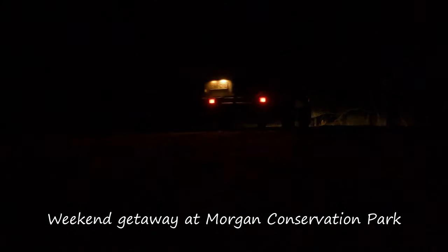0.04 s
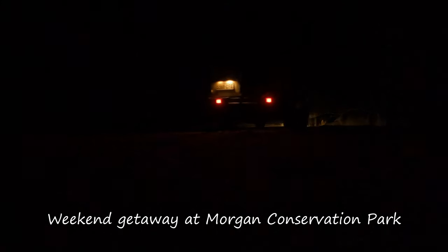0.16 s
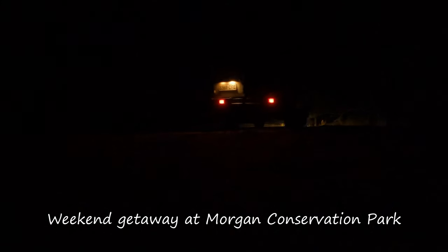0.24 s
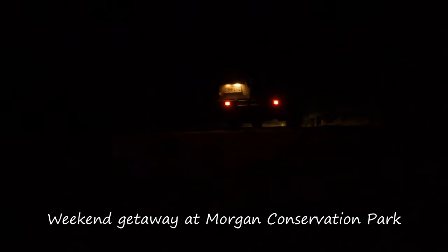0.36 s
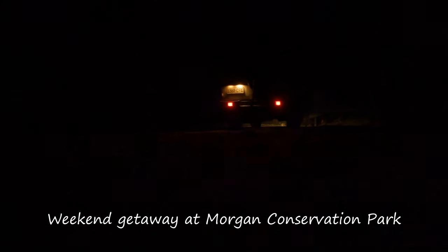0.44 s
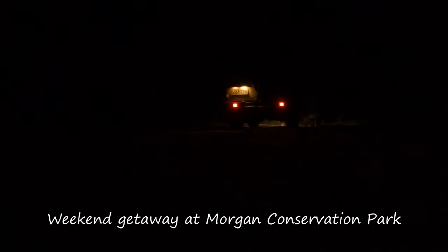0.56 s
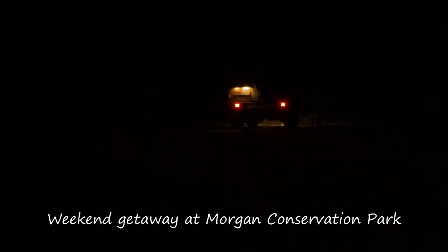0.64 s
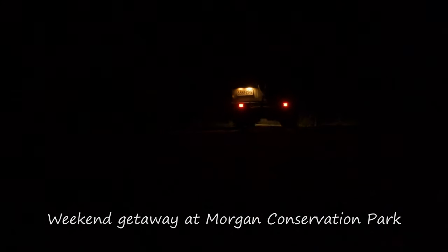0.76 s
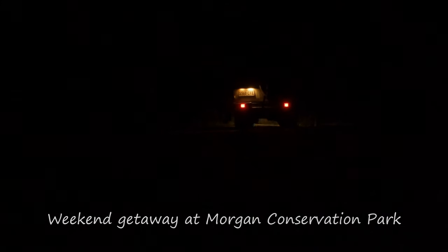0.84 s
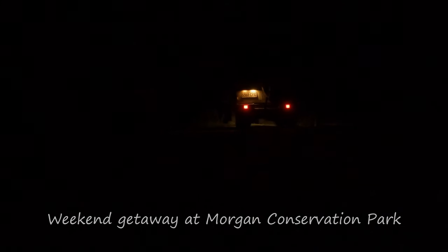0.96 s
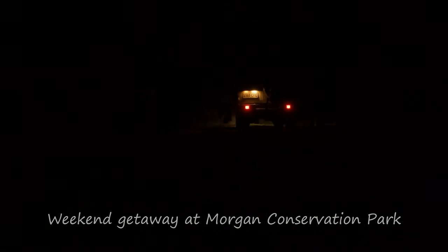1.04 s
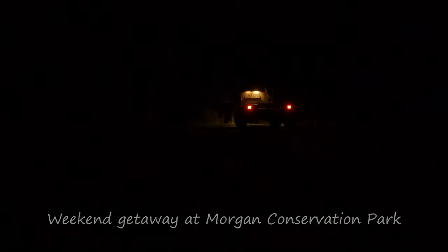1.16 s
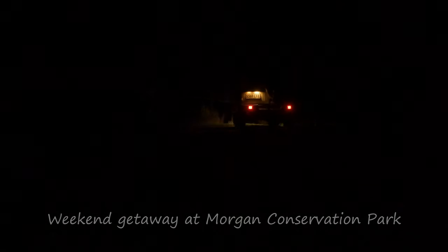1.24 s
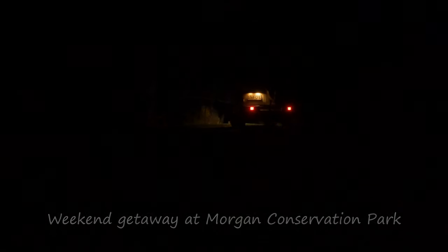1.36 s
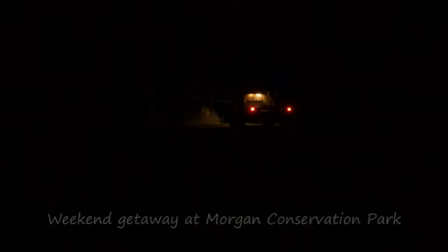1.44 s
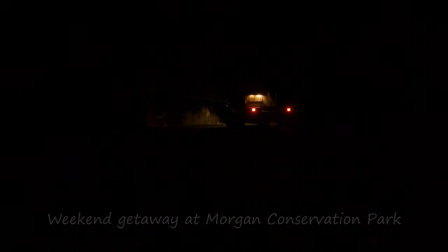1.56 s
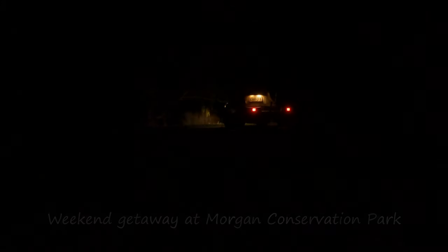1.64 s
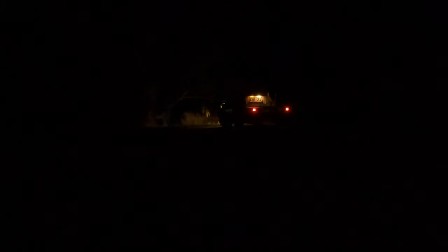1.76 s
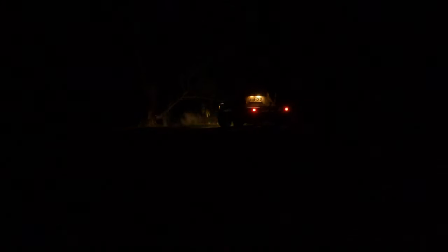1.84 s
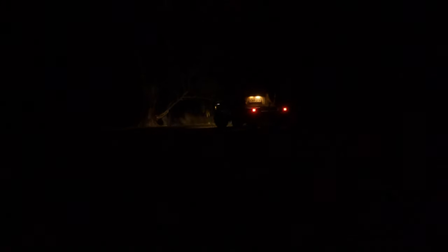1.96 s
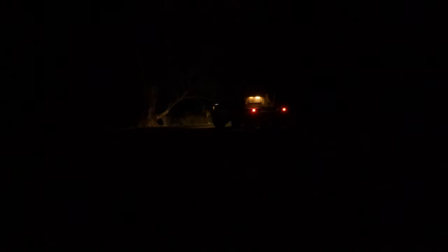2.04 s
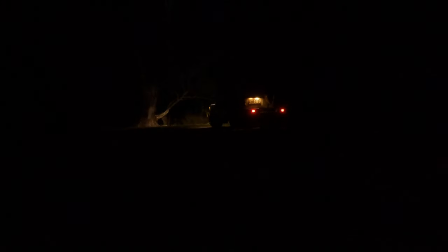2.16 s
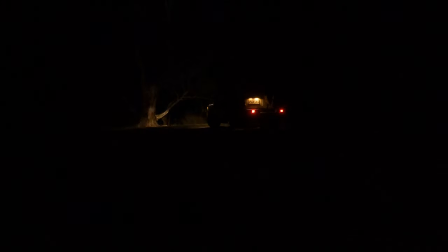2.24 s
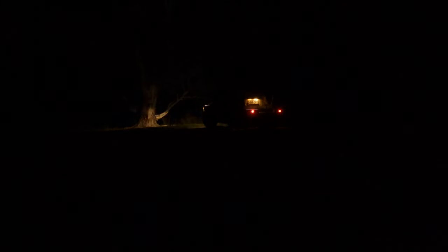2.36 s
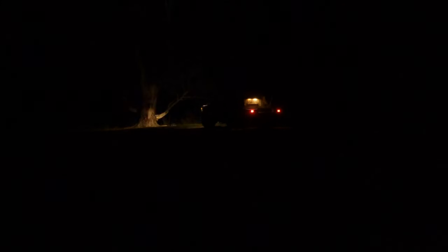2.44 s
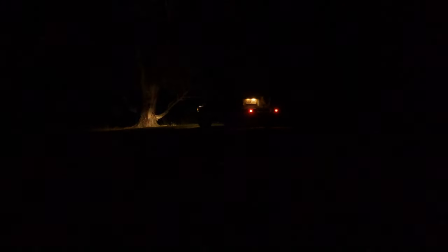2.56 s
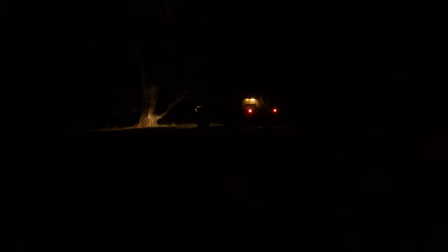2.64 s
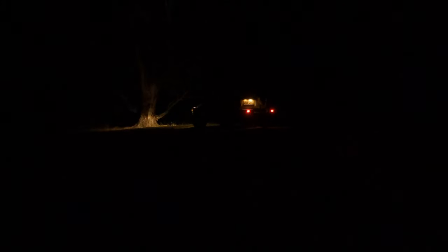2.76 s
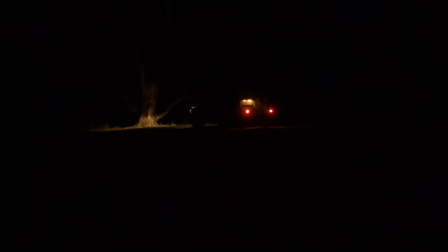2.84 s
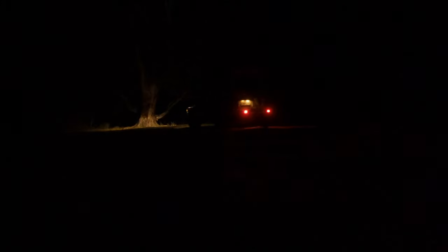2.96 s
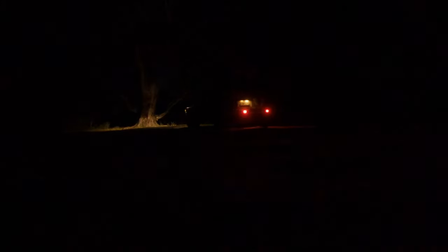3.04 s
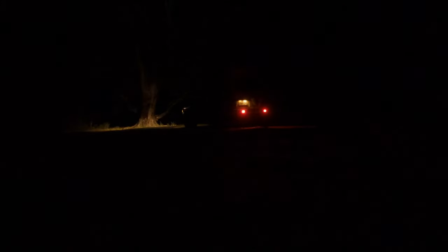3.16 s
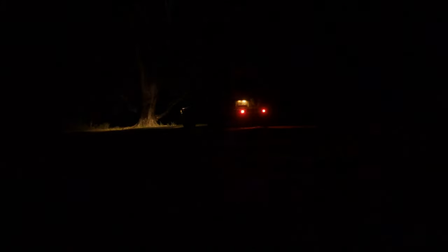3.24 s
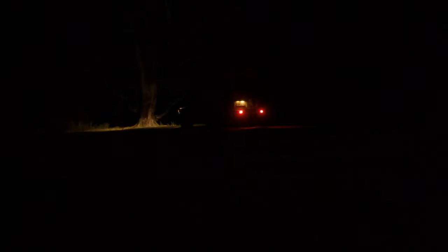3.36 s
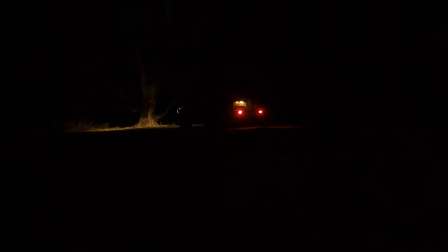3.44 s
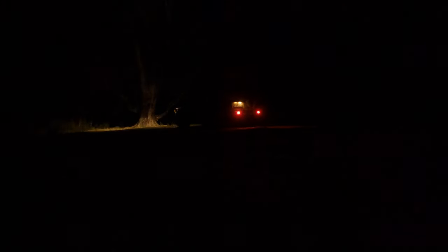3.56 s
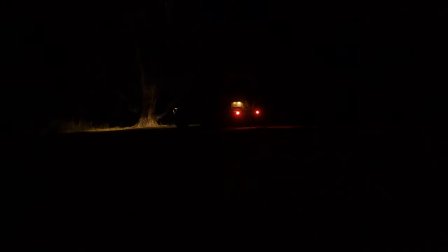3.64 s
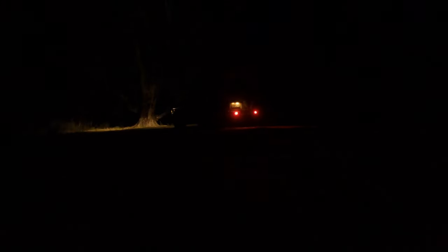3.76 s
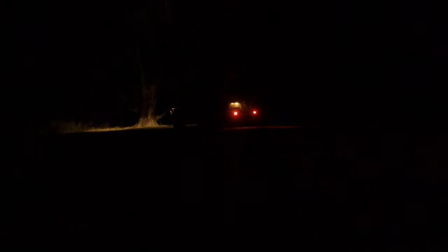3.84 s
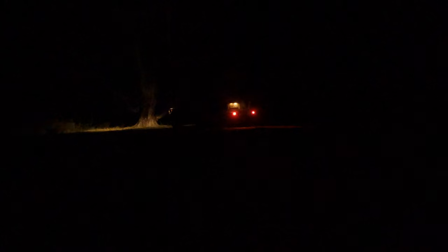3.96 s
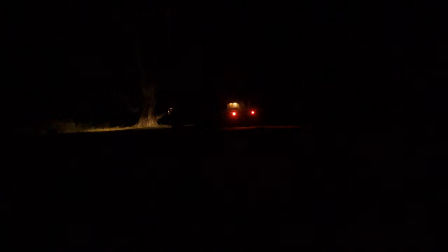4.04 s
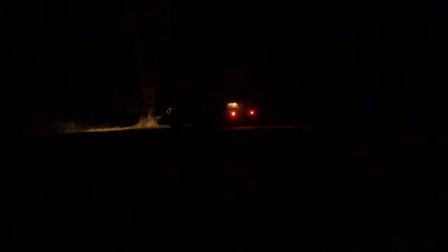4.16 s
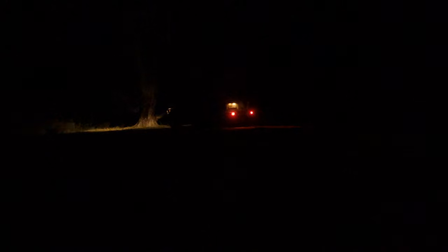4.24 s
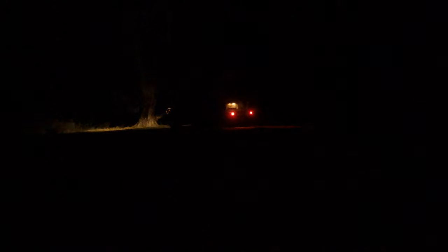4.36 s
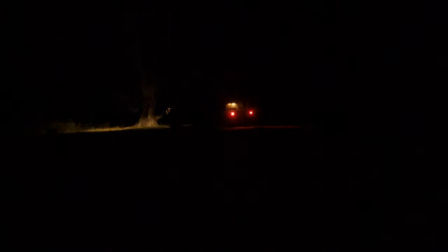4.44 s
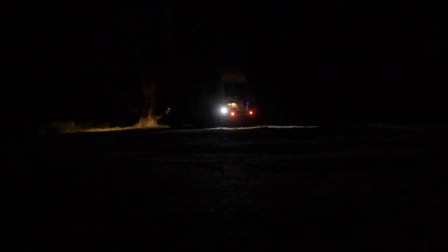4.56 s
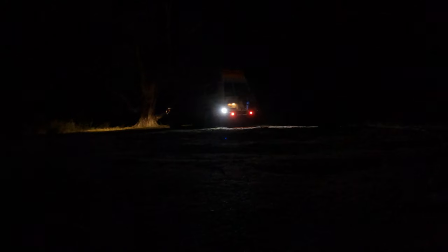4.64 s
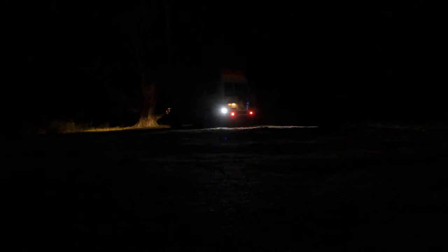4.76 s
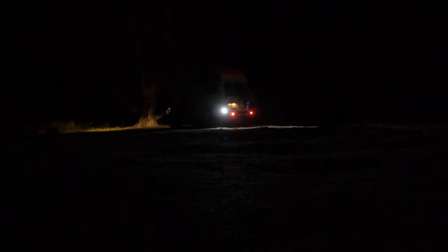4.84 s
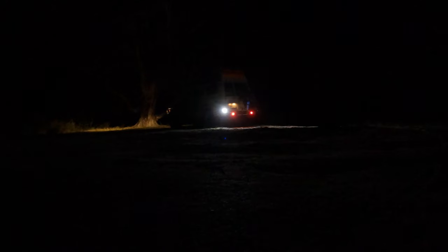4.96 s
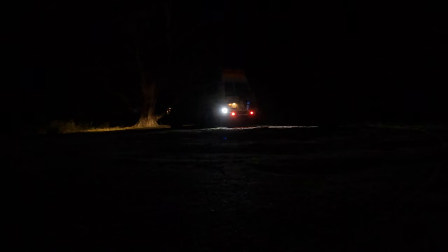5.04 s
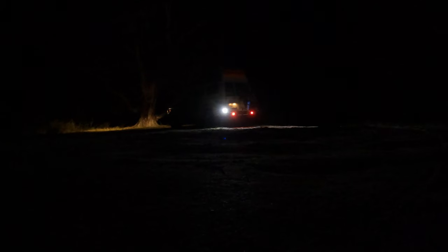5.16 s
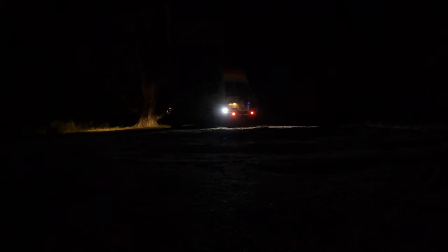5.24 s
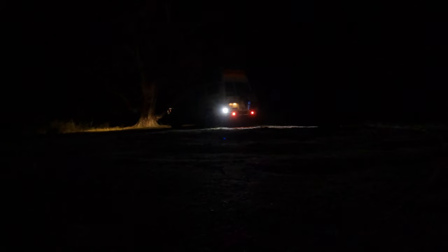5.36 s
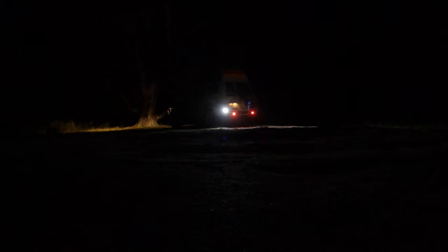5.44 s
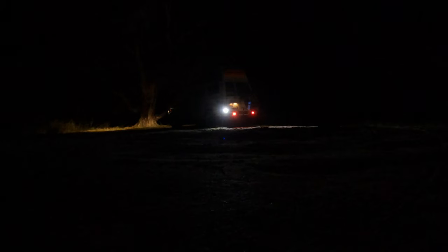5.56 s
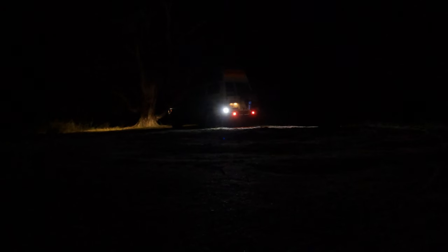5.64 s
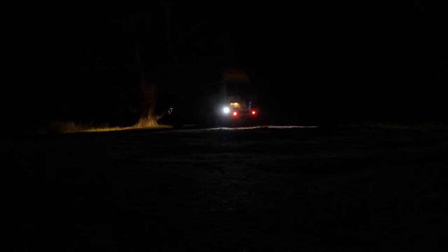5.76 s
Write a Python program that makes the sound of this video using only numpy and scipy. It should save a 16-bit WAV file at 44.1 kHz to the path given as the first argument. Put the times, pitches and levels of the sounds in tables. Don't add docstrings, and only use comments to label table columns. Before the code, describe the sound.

Low droning van engine recedes, drops to idle, grates and knocks into gear, and gently revs up, with small ticks and soft wind bumps.

```python
import sys
import numpy as np
from scipy import signal
from scipy.fft import rfft, irfft, next_fast_len
from scipy.io import wavfile
from scipy.ndimage import uniform_filter1d, map_coordinates

SR = 44100
rng = np.random.default_rng(int(sys.argv[2]) if len(sys.argv) > 2 else 0)


def boost(x):
    u = np.asarray(x, float) / 20
    return 10 ** u


def master(y):
    cut = np.clip(np.atleast_2d(y).T, -1, 1)
    pcm = np.round(cut * 32767)
    wavfile.write(sys.argv[1], SR, pcm.astype(np.int16))


N = 255339


def unit(x):
    return x / np.sqrt(np.mean(x ** 2) + 1e-20)


def curves(rows):
    s, *cols = np.transpose(rows)
    return [np.interp(np.arange(N) / SR, s, c) for c in cols]


def along(points, hz):
    f, v = np.transpose(points)
    return np.interp(np.log(hz + 1), np.log(f + 1), v)


def wobble(rate_hz, step=1):
    knots = rng.standard_normal(int(N * rate_hz / SR) + 4)
    return map_coordinates(knots, [np.arange(0, N, step) * rate_hz / SR])


def noise(spectrum, gate):
    # f/Hz, correlation/1
    likeness = [(60, .985), (250, .98), (500, .97), (1000, .94), (2000, .82), (4000, .62), (10000, .66)]
    # f/Hz, left minus right/dB
    lean_db = [(125, .3), (250, -.7), (500, -1.5), (1000, -1.4), (2000, -.5), (4000, .7), (8000, 1.6),
               (12000, 2.4)]
    m = next_fast_len(N + 8192)
    hz = np.fft.rfftfreq(m, 1 / SR)
    angle = np.arccos(np.clip(along(likeness, hz), -1, 1)) / 2
    raw = rfft(gate * rng.standard_normal((2, N)), m)
    mid, side = raw * boost(along(spectrum, hz)) * [np.cos(angle), np.sin(angle)]
    lean = boost(along(lean_db, hz) / 2)
    return unit(irfft([(mid + side) * lean, (mid - side) / lean], m)[:, :N])


def boom_db(hz):
    def peak_db(at_hz, width_hz):
        detuning = width_hz / 2 / (hz - at_hz + 1e-6)
        return -10 * np.log10(.06 + 1 / (1 / .94 + detuning ** 2))

    return peak_db(124, 8) + peak_db(253, 18)


def exhaust(firing_hz, loud_db, load_db):
    # order/1, pulling/dB, idling/dB
    exhaust_orders = [(5, -51, -57), (6, -30, -36), (9, -33, -54), (11, -44, -58), (12, -32, -33),
                      (13, -58, -49), (14, -51, -60), (15, -53, -51), (16, -46, -52), (17, -37, -55),
                      (18, -19, -33), (19, -29, -47), (20, -41, -48), (21, -41, -40), (22, -46, -41),
                      (23, -46, -38), (24, -41, -32), (25, -45, -40), (26, -50, -52), (27, -50, -53),
                      (28, -43, -58), (30, -48, -42), (31, -46, -59), (34, -49, -67),
                      (36, -45, -42), (37, -34, -62), (38, -49, -63), (39, -53, -66), (41, -53, -71),
                    (42, -54, -57), (43, -49, -59), (44, -60, -55), (48, -58, -58), (49, -60, -66),
                    (51, -60, -67), (52, -56, -66), (53, -60, -68), (54, -56, -55), (55, -53, -64),
                    (56, -59, -65), (68, -73, -60), (72, -59, -70), (73, -53, -70), (74, -68, -72),
                    (91, -61, -72), (92, -64, -72), (110, -67, -74), (122, -74, -65), (137, -69, -76)]
    # trim/dB, share of loudness/1, share of load/1,
    # slope with extra speed pulling/(dB/Hz), idling/(dB/Hz)
    multiples = [(.1, 1.2, .1, -4.5, -2.5), (.1, 0.53, -0.6, 4.3, -5), (.1, .7, 1, 0, 4),
                 (1.5, 0.82, 0.55, -1.8, 0.5)]
    side_lead = [(0, 0), (.28, .11), (.6, -.06), (-.4, -.39)]
    cylinders, step = 6, 16
    side_load = 0.22
    overrun_hz_per_s, overrun_db = 15, 0.9
    treble_fade_db_per_s = 2

    cycle = 2 * np.pi * np.cumsum(firing_hz)[::step] / SR / cylinders
    firing_hz, loud_db, load_db = firing_hz[::step], loud_db[::step], load_db[::step]
    t = np.arange(len(cycle)) * step / SR
    offset_db = loud_db + side_load * load_db
    pull = np.clip((firing_hz - 33.5) / 6, 0, 1)
    usual_hz = 32.6 + 8.5 * pull
    fall_hz_per_s = uniform_filter1d(-np.gradient(firing_hz) * SR / step, size=100)
    choke_db = overrun_db * np.maximum(fall_hz_per_s - overrun_hz_per_s, 0)
    out = np.zeros(len(cycle))
    for order, pulling_db, idling_db in exhaust_orders:
        times = round(order / cylinders)
        away = int(abs(order - times * cylinders))
        base_db = idling_db + pull * (pulling_db - idling_db)
        if not away and times <= len(multiples):
            trim_db, loud, load, fast_pull, fast_idle = multiples[times - 1]
            db = base_db + trim_db + loud * loud_db + load * load_db
            db += (firing_hz - usual_hz) * (fast_idle + pull * (fast_pull - fast_idle))
            db -= choke_db * (times == 1)
        else:
            db = base_db + offset_db * min(order / 22, 1.2)
            db += boom_db(order * firing_hz / cylinders) - boom_db(order * usual_hz / cylinders)
            db -= (order > 60) * pull * treble_fade_db_per_s * (t - .7)
        pulling, idling = side_lead[away]
        idling += (away > 0) * (times % 2) / 2
        lag = 2 * np.pi * (.17 * times ** 2 + idling + pull * (pulling - idling))
        shake = (.003 * order + (order / 80) ** 2) * wobble(7, step)
        db = db + min(.5 + (order / 60) ** 2, 2.5) * wobble(6, step)
        out += np.sqrt(2) * boost(db) * np.cos(order * cycle + lag + shake)
    out = signal.resample_poly(out, step, 1, padtype="line")[:N]
    late = np.r_[out[:2], out[:-2]]
    return np.array([late, out]) * boost([[.2], [-.2]])


def rush_levels(loud_db):
    # far/dB, close-by boost/dB, fading/s, boost once the bonnet faces us/dB, pick-up/dB
    layers = [
        (-58.5, 10, 1.2, -0.36, 5.5),
        (-72, 8.5, .4, 3, 1),
        (-45.5, 6, 0.5, 1, 2.5),
        (-86, 8, 0.9, 8, 2),
    ]
    turn_s, pickup_s = (2.05, 3.32), (5.264, 5.92)
    t = np.arange(N) / SR
    turned, pickup = np.interp(t, turn_s, (0, 1)), np.interp(t, pickup_s, (0, 1))
    gas, clatter, roar, fizz = (far + near * np.exp(-t / fade) + turn * turned + off * pickup
                                for far, near, fade, turn, off in layers)
    return gas, clatter, roar + 0.61 * loud_db, fizz


def rush(firing_hz, loud_db):
    # f/Hz, level/(dB/Hz)
    gas_spectrum = [(290, -31), (500, -7.5), (690, -14), (800, -14.5), (1000, -13.5), (1400, -15.5),
                    (2200, -27), (2800, -32), (3300, -38), (4000, -45), (6700, -120)]
    # f/Hz, level/(dB/Hz)
    valve_spectrum = [(1800, -27.5), (2400, -3), (2800, 5.5), (3300, -0.5), (4100, -4), (5000, 0.5),
                      (6500, -2), (7700, -5.5), (8300, -12), (10000, -19), (14500, -60)]
    # f/Hz, level/(dB/Hz)
    fizz_spectrum = [(5000, -44), (7500, -4.5), (8500, -5), (10000, -0.5), (11500, -5.5), (12500, -10),
                     (13500, -17), (14500, -65)]
    # f/Hz, level/(dB/Hz)
    roar_spectrum = [(20, -30), (45, -12), (125, -8), (200, -10), (280, -8), (400, -14), (600, -24),
                     (1000, -40), (2000, -90)]
    gas_db, clatter_db, roar_db, fizz_db = rush_levels(loud_db)
    turns = np.cumsum(firing_hz) / SR + 0.28
    strength = np.clip(rng.standard_normal(int(turns[-1]) + 2), -1.6, 1.6)[turns.astype(int)]
    burst = uniform_filter1d(np.exp(-(turns % 1) / 0.49) * boost(3.4 * strength), size=90)
    gas = boost(gas_db + .6 * wobble(7)) * noise(gas_spectrum, 1 + .5 * burst)
    clatter = boost(clatter_db + 0.78 * wobble(5.5)) * noise(valve_spectrum, 1 + 0.66 * burst)
    fizz = boost(fizz_db + .9 * wobble(11)) * noise(fizz_spectrum, 1 + 1.4 * burst)
    roar = boost(roar_db + 2.5 + 0.26 * wobble(13)) * noise(roar_spectrum, 1 + 0.35 * burst)
    return gas + clatter + fizz + roar


def ring(modes, t):
    return sum(boost(db + rng.normal(0, 3.6) - 60 * t / t60_s) * np.sin(2 * np.pi * hz * t)
               for hz, db, t60_s in modes)


def gearbox():
    # t/s, peak/dB, thud/dB, grate/dB, crack/dB
    knocks = [(4.715, -34, -1, -11.5, -34), (4.72, -29.5, -3, -11.5, -35), (4.727, -38.5, -4, -14.5, -39),
              (4.735, -33, -3, -8.5, -38), (4.738, -34.5, -12, -24, -32), (4.751, -37.5, -9, -8, -23.5),
              (4.759, -34, 2.5, -5.5, -32), (4.767, -35.5, 12.5, -16.5, -29),
              (4.773, -41.5, 9.5, -19, -32.5), (4.784, -49, -6, -7.5, -16.5),
              (4.798, -39, 10.5, -9.5, -6.5), (4.804, -39.5, 9, -1, -10), (4.811, -42.5, 7, -11, -18),
              (4.833, -36, -7, -19.5, -29), (4.845, -46, -4, -16, -19), (4.868, -60.5, 20, -17, -17),
              (5.028, -47, 7, -15, -14), (5.034, -39, 4, -15.5, -16.5)]
    # f/Hz, level/dB, t60/s
    casing_modes = [(723, 1, 0.039), (966, 4.5, 0.026), (1055, 7.5, 0.013), (1390, -8, 0.0051)]
    # f/Hz, level/dB, t60/s
    teeth_modes = [(1570, -0.5, 0.021), (2000, -4, 0.023), (2277, 3.5, 0.012), (2660, 3, 0.011),
                   (3420, -15, 0.012)]
    # f/Hz, level/dB, t60/s
    housing_modes = [(275.4, -0.5, 0.11), (401.7, 8, 0.049), (542, -1, 0.03)]
    out, t = np.zeros(N + SR), np.arange(SR // 5) / SR
    crack_band = signal.butter(3, [3500, 8500], "band", fs=SR, output="sos")
    for s, db, thud_db, grate_db, crack_db in knocks:
        scrape = rng.standard_normal((3, len(t))) * boost(-60 * t / .035) * (1 - np.exp(-t / .0006))
        casing = signal.fftconvolve(scrape[0], ring(casing_modes, t))[:len(t)]
        teeth = signal.fftconvolve(scrape[1], ring(teeth_modes, t))[:len(t)]
        blow = boost(1.0) * casing / np.abs(casing).max()
        blow += boost(grate_db + 2.5) * teeth / np.abs(teeth).max()
        blow += boost(thud_db - 5) * ring(housing_modes, t) * (1 - np.exp(-t / 0.0026))
        blow += boost(crack_db + 3.0) * signal.sosfilt(crack_band, scrape[2])
        out[round(s * SR):][:len(t)] += boost(db) * blow
    out = out[:N]
    tail = rng.standard_normal((2, SR // 2)) * boost(-60 * np.arange(SR // 2) / SR / .9)
    tail += 0.82 * tail.sum(axis=0)
    tail = signal.sosfilt(signal.butter(1, [1000, 4000], "band", fs=SR, output="sos"), tail)
    tail /= np.linalg.norm(tail[0])
    return out + boost(-11.5) * signal.fftconvolve(out[None], tail, axes=1)[:, :N]


def ticks():
    # t/s, peak/dB, left minus right/dB, t60/s
    contacts = [(.413, -55, 1, .04), (.431, -49, -4.5, .04), (.541, -57.5, -8, .04),
                (0.7742, -58, -.5, 0.017), (.826, -56, -0.8, 0.018), (1.2438, -58.5, -0.4, .02),
                (1.6372, -60, 4, 0.018), (1.661, -55, 2, .03), (2.4524, -62.5, 0, .02),
                (2.835, -52, 1, .05), (2.866, -53, 3, 0.045), (2.8975, -58, 3.5, 0.045),
                (2.9508, -58, -2.1, 0.045), (3.686, -52, 5, 0.018), (3.798, -52, 4, .009),
                (3.801, -48.5, 0.5, .012), (3.807, -49, 2.5, 0.012), (3.8147, -44.5, 5, .011),
                (3.841, -57, 4.5, .009), (3.860, -47.5, 3.5, 0.0099), (3.9043, -57, 7, .012),
                (4.2359, -54.5, 6, 0.017), (5.101, -58, -2.5, .025), (5.1296, -56.5, 0, .025),
                (5.5563, -54.5, -7, .02)]
    brittle_s = .016
    out, t = np.zeros((2, 2, N + SR)), np.arange(SR // 25) / SR
    for s, db, pan_db, t60_s in contacts:
        start = round(s * SR)
        attack = 1 - np.exp(-t / (.04 * t60_s))
        snap = boost(db - 60 * t / t60_s) * attack * rng.standard_normal(len(t))
        out[int(t60_s < brittle_s), :, start:start + len(t)] += snap * boost([[pan_db / 2], [-pan_db / 2]])
    dull = signal.butter(2, [2800, 8500], "band", fs=SR, output="sos")
    bright = signal.butter(3, [5000, 12500], "band", fs=SR, output="sos")
    return signal.sosfilt(dull, out[0, :, :N]) + signal.sosfilt(bright, out[1, :, :N])


def breeze():
    # middle t/s, half length/s, peak/dB
    gust_events = [
        (0.037, .08, -42.5),
        (1.452, .2, -56.5),
        (2.297, .2, -58.5),
        (3.248, 0.37, -43),
        (3.745, 0.32, -45),
        (4.57, .14, -48.5),
        (5.47, .11, -34),
    ]
    # f/Hz, level/(dB/Hz)
    puff_spectrum = [(5, -14), (15, -3.5), (40, -5.5), (70, -23.5), (150, -58.5), (400, -140)]
    t = np.arange(N) / SR
    calm_db = -59
    gusts = boost(calm_db) + sum(boost(db) * np.exp(-((t - s) / half_s) ** 4) for s, half_s, db in gust_events)
    lumps = boost(2.5 * wobble(7.4))
    return gusts * boost(6.0) * noise(puff_spectrum, lumps)


def scene():
    # t/s, firing rate f/Hz, loudness/dB, load/dB
    engine = [(0, 42.29, -0.5, 2.5), (.5, 40.84, -0.5, -0.05), (1.15, 41.28, 1, -0.9),
              (1.42, 40.52, -1, -4), (1.66, 41.88, 1, 2.3), (1.82, 41.19, -2, 2.6),
              (1.99, 40.03, 0.5, -10.5), (2.28, 39.94, -1.5, -17), (2.5, 40.13, -2.5, -3),
              (2.62, 40.34, -3, -4), (2.755, 34.87, -7, -3.5), (2.81, 32.63, -8, 4), (3.15, 32.76, -0.4, 0),
              (3.7, 32.25, -1, 3), (4.17, 32.89, -0.5, -1.5), (5.36, 32.21, -1, 2.5),
              (5.6, 35.89, -2.5, -5), (5.79, 37.95, -1, -10.5)]
    firing_hz, loud_db, load_db = curves(engine)
    van = exhaust(firing_hz, loud_db, load_db) + rush(firing_hz, loud_db) + gearbox()
    return van + ticks() + breeze()


def band_limit(x):
    return signal.sosfilt(signal.butter(12, 14200, fs=SR, output="sos"), x)


def record(dry):
    edge_s = np.minimum(np.arange(N), np.arange(N)[::-1]) / SR
    mix = dry * (1 - 0.66 * np.exp(-edge_s / 0.0044))
    return band_limit(mix)


dry = scene()
out = record(dry)
master(out)
```